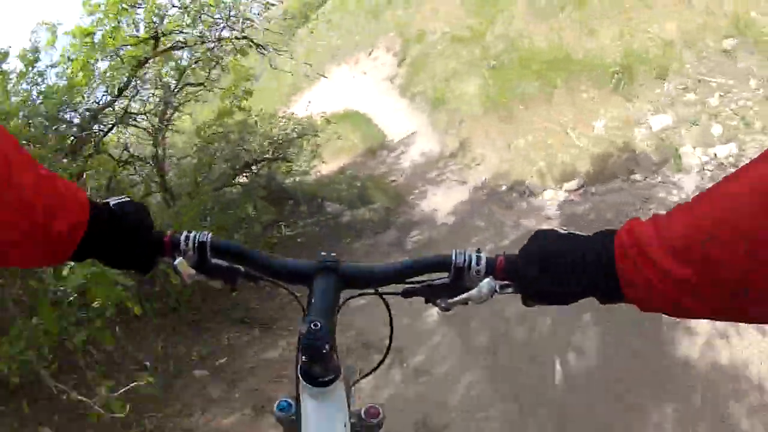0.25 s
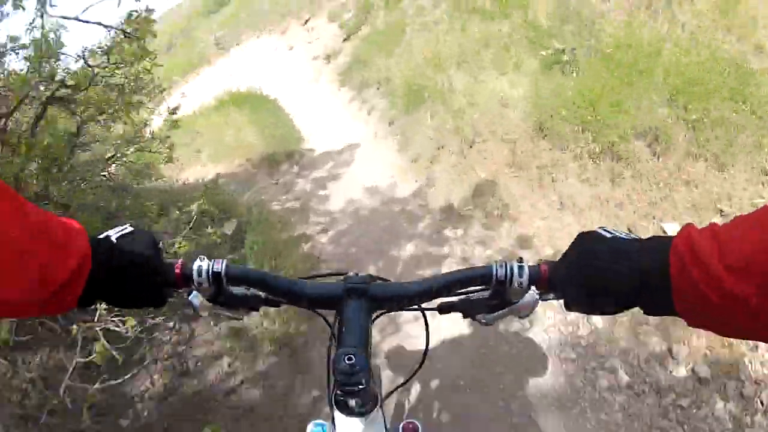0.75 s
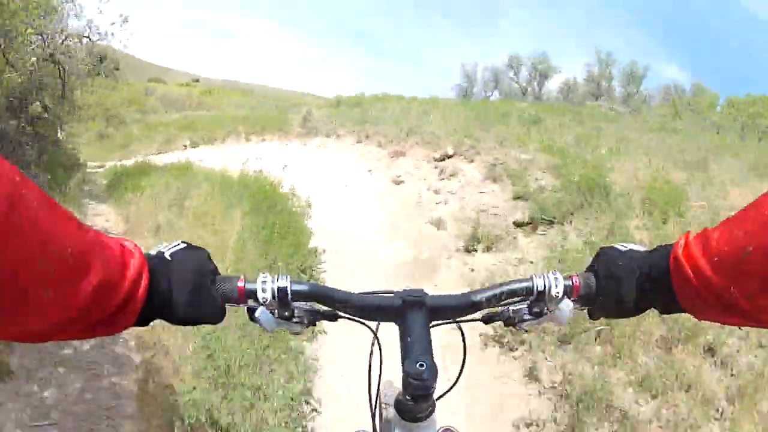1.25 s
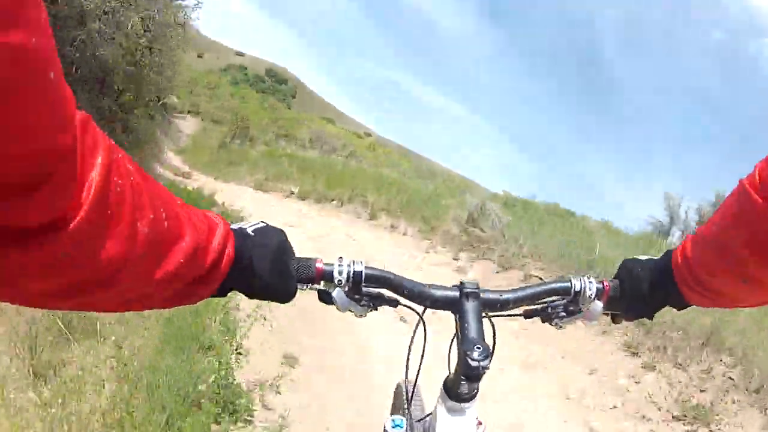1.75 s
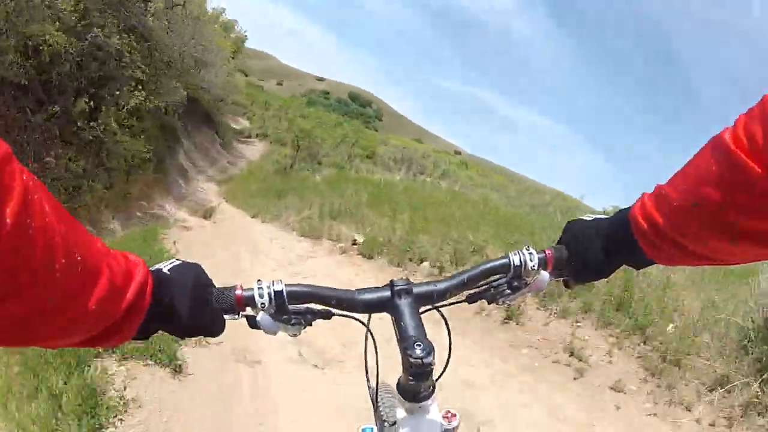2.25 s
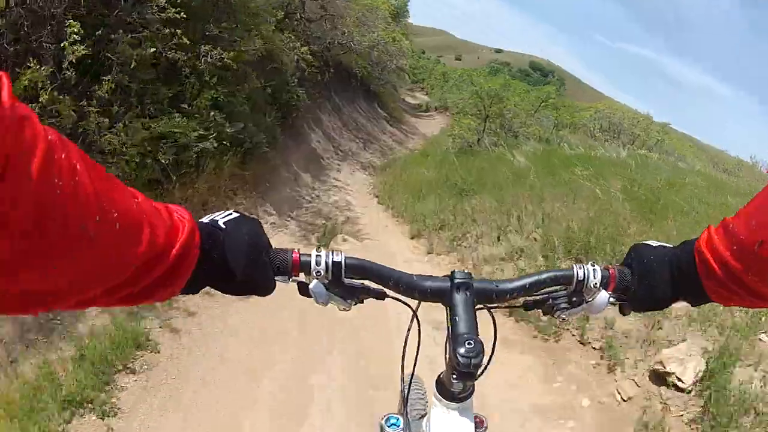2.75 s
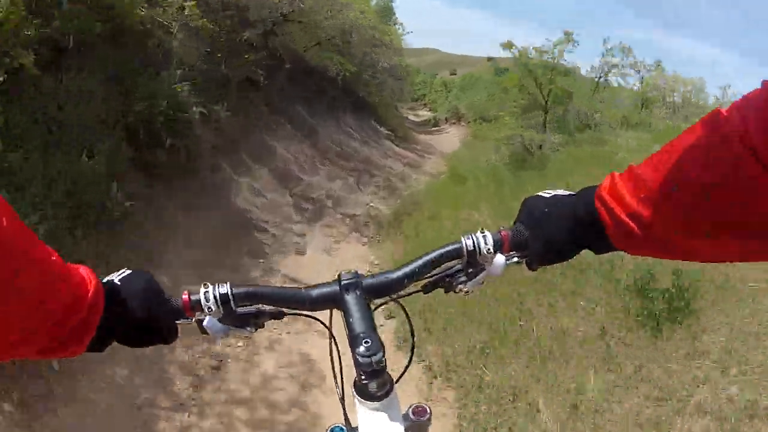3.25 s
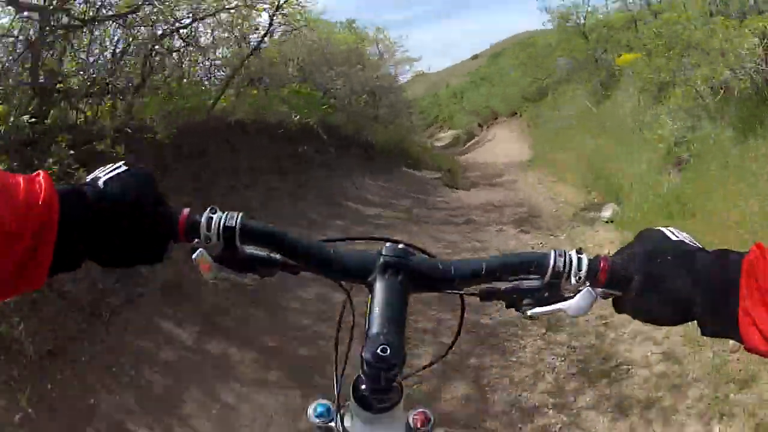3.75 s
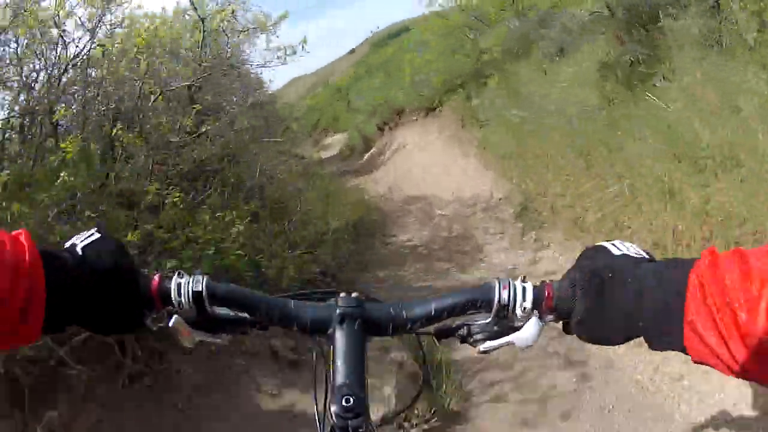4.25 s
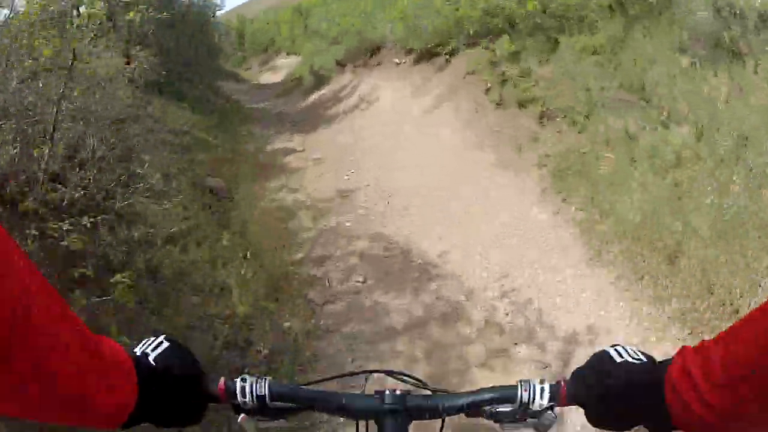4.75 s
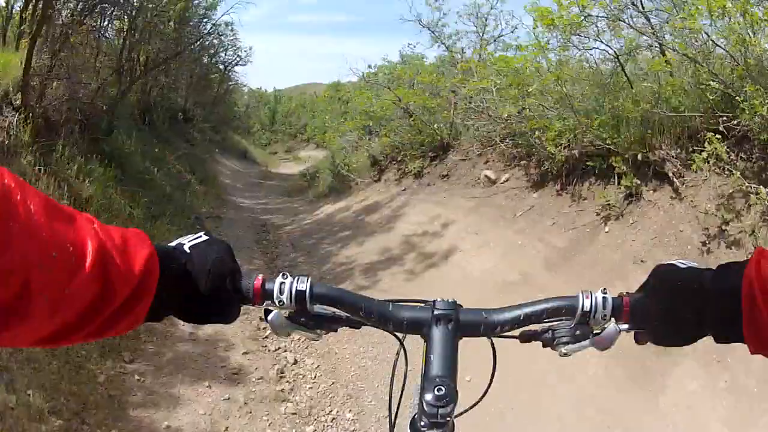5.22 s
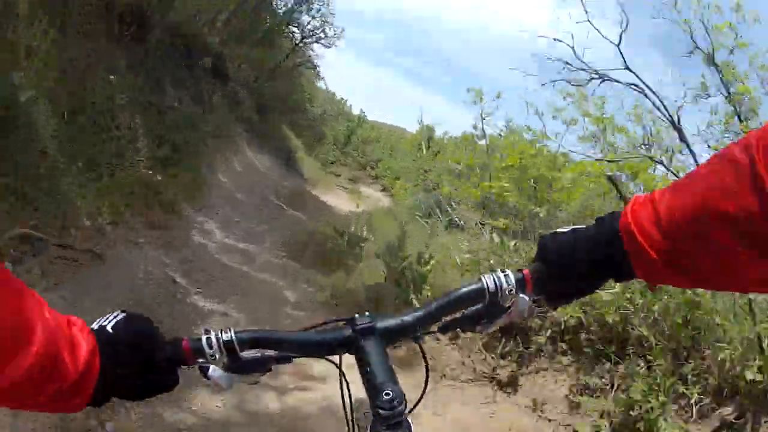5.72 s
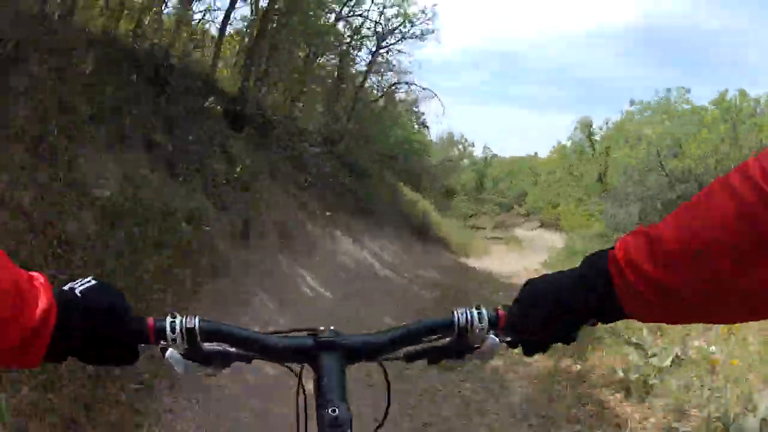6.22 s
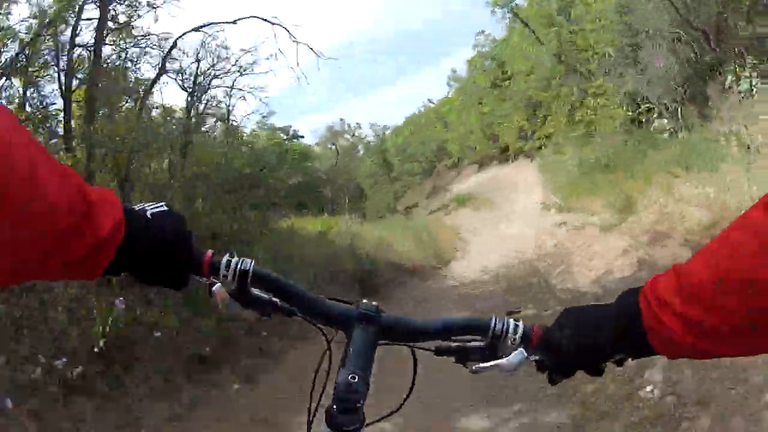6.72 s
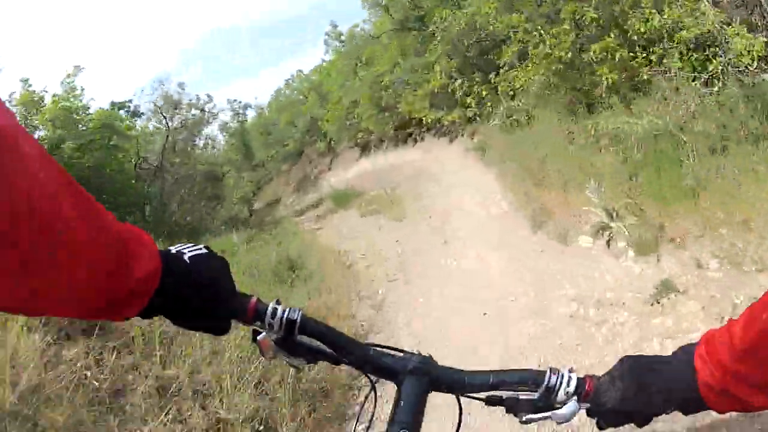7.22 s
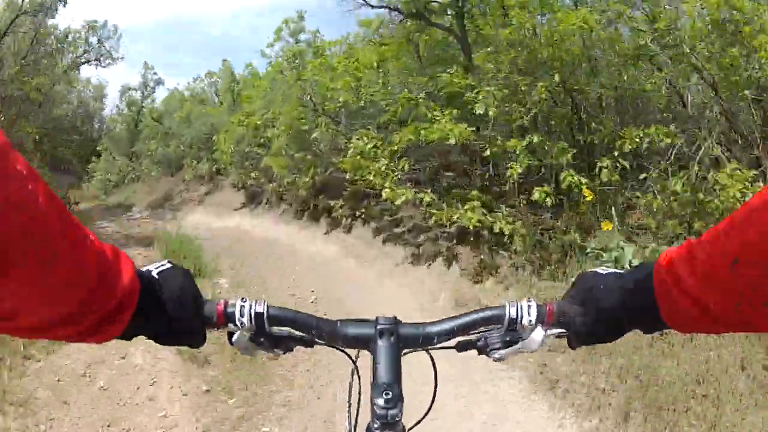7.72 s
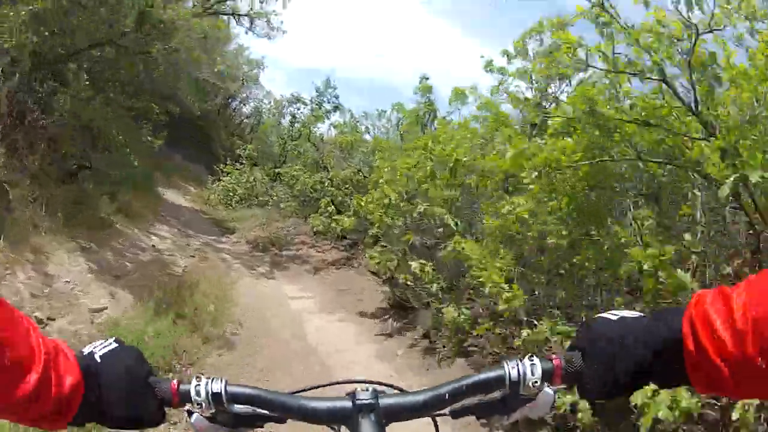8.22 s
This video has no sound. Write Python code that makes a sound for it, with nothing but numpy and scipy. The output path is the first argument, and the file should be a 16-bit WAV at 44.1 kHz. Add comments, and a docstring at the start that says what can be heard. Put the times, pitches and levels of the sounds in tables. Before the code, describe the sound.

Close, muffled, slightly gritty sound from a chest-mounted camera: boomy wind and tyre rumble on dry dirt. Faint brake chirps and chain ticks open the ride. A strong gust covers wheel knocks, then stony crunches come in bursts with snappy plastic taps, metallic chain strikes and one violent mount slam. The tyres lighten over crests before a last cluster of clicks and knocks.

```python
"""A mountain bike runs down a dirt trail, heard from a camera in a plastic case on the rider's chest.
A brake pad sings faintly twice, then the chain jingles, steel partials behind noisy ticks; filtered-noise
wind and tyre rumble run throughout. Gusts lead to the strongest wind near 2.8 s as wheels knock the frame's
damped modes; from 3.4 s gravel crunches in showers of tiny decaying tones, plastic clicks come thick, and the
mount clacks in noise bursts, hardest at 5.1 s. The tyres hush over crests at 4.8 and 7 s before last knocks."""
import sys
import numpy as np
from scipy import signal
from scipy.fft import rfft, irfft, next_fast_len
from scipy.io import wavfile
from scipy.ndimage import map_coordinates

SR = 44100
rng = np.random.default_rng(int(sys.argv[2]) if len(sys.argv) > 2 else 0)


def generate_wav(sig):
    """Save sig (samples, or channels by samples) to the path in sys.argv[1] as 16-bit PCM at SR."""
    pcm = np.round(np.clip(np.atleast_2d(sig).T, -1, 1) * 32767).astype(np.int16)
    wavfile.write(sys.argv[1], SR, pcm)


N = 373527

# Resonances of the case mount. Each row: pitch in Hz, relative level in dB, ring time t60 in seconds
# when nothing else damps it.
MOUNT_MODES = [(1390, -11, 0.032), (2200, -1, 0.047), (2500, -0.5, 0.057), (3005, -7, 0.11),
               (3530, -27, 0.25), (4000, -33, 0.02), (4970, -39, .04)]
# Tone of a chain link ticking on the frame. Each row: frequency in Hz, relative level in dB per Hz.
TICK_SPECTRUM = [(1200, -11), (2600, 1.5), (4000, -1), (4900, 0.5), (5500, -8), (6000, -16)]
SMOOTH_GRIT_DB = -41  # grit on smooth packed dirt, before the fine-grit trim in scene()


def amp(db):
    """Decibels to gain."""
    return 10 ** (np.asarray(db) / 20)


def unit(x):
    """Scale to rms 1."""
    return x / np.sqrt(np.mean(x ** 2) + 1e-20)


def peaked(x):
    """Scale to peak 1."""
    return x / (np.abs(x).max() + 1e-20)


def curves(rows):
    """One value per sample for each column after the time."""
    s, *cols = np.transpose(rows)
    return [np.interp(np.arange(N) / SR, s, c) for c in cols]


def wobble(rate):
    """A smooth random curve, rate knots a second."""
    knots = rng.standard_normal(int(N * rate / SR) + 4)
    return map_coordinates(knots, [np.arange(N) * rate / SR])


def coloured(x, spectrum, size=8192):
    """x through a causal, minimum-phase filter with the given (Hz, dB) points."""
    hz, db = np.transpose(spectrum)
    gain = amp(np.interp(np.log(np.fft.rfftfreq(size, 1 / SR) + 1), np.log(hz), db))
    # fold the cepstrum so that all the energy comes after the start
    cepstrum = irfft(np.log(gain))
    cepstrum[1:size // 2] *= 2
    cepstrum[size // 2 + 1:] = 0
    impulse = irfft(np.exp(rfft(cepstrum)))
    return signal.fftconvolve(x, impulse)[:len(x)]


def ringing(modes, t, scatter_db):
    """Damped modes, struck at new strengths every time."""
    total = 0
    for hz, db, t60 in modes:
        envelope = amp(db + scatter_db * rng.standard_normal() - 60 * t / t60)
        total = total + envelope * np.sin(2 * np.pi * (hz * t + rng.random()))
    return total


def add(track, s, sound):
    """Mix a sound into the track at time s."""
    room = track[max(round(s * SR), 0):][:len(sound)]
    room += sound[:len(room)]


def in_case(x):
    """Sound heard through the plastic case, which muffles it and rings at its resonances."""
    # What the plastic lets through. Each row: frequency in Hz, gain in dB.
    passed = [(400, -3), (1100, -12), (1800, -11.5), (2350, -5), (3000, -3), (3700, -5), (4750, -12.5),
              (5400, -15.5), (6000, -27.5)]
    # Air and wall resonances. Each row: centre in Hz, width in Hz, boost in dB.
    resonances = [(2070, 76, 4.5), (2550, 84, 5.5), (2867, 92, 7), (4680, 134, 8)]
    x = coloured(x, passed)
    boosted = x
    for hz, width, db in resonances:
        b, a = signal.iirpeak(hz, hz / width, fs=SR)
        boosted = boosted + (amp(db) - 1) * signal.lfilter(b, a, x)
    return boosted


def airstream():
    """Wind level in dB: the basic stream plus gusts that swell and fall smoothly."""
    # Strength of the stream on the microphone. Each row: time in seconds, level in dB before gusts.
    stream = [(0, -19.5), (0.18, -26), (0.42, -20), (0.78, -19.5), (1.05, -15), (1.42, -20.5), (1.85, -17),
              (2.14, -21), (2.55, -11.5), (2.82, -4), (3.05, -11), (3.17, -18.5), (3.68, -8), (4.0, -14),
              (4.88, -11.5), (5.02, -19), (5.55, -19), (5.9, -20), (6.05, -15), (6.85, -17.5), (7.35, -19),
              (7.9, -16.5), (8.14, -20), (8.47, -25.5)]
    # Sudden gusts on top. Each row: time of the peak in seconds, length in seconds, boost in dB.
    gusts = [(0.62, 0.21, 2.5), (1.711, 0.096, 4.5), (2.054, 0.058, 5), (2.233, 0.15, 7.5),
             (2.329, 0.087, 4), (2.473, 0.16, 7), (5.11, 0.14, 6.5), (5.272, 0.19, 4.5), (5.64, 0.26, 5),
             (6.844, 0.2, 2.5), (7.82, 0.08, 3), (8.24, 0.11, 7)]
    level_db, = curves(stream)
    for s, length, boost_db in gusts:
        add(level_db, s - length / 2, boost_db * np.hanning(round(length * SR)))
    return level_db


def wind(level_db, lumps_db=0.95, tearing_db=-28.5):
    """Eddies hit the microphone in quick lumps; stronger gusts tear up more fine turbulence."""
    # Low buffeting. Each row: frequency in Hz, relative level in dB per Hz.
    buffet_spectrum = [(12, -3), (28, -7.5), (60, -2.5), (120, 0.5), (200, 0), (300, -1.5), (420, -8),
                       (600, -18.5), (900, -31.5), (1500, -44), (3000, -59), (4800, -52), (6000, -72)]
    # Fine turbulence. Each row: frequency in Hz, relative level in dB per Hz.
    tearing_spectrum = [(300, -29), (800, 11.5), (1500, -1.5), (3000, -28.5), (4800, -44), (6000, -18)]
    lumps = amp(lumps_db * wobble(28))
    buffet = unit(coloured(rng.standard_normal(N), buffet_spectrum) * lumps)
    force = amp(level_db) * buffet
    turbulence = unit(coloured(rng.standard_normal(N), tearing_spectrum))
    return force + amp(tearing_db) * force ** 2 * turbulence


def ground():
    """Grit level in dB: each patch of gravel builds up, holds and settles over the packed dirt."""
    # Tyres biting into loose gravel. Each row: time of full bite in seconds, build-up time constant in
    # seconds, hold in seconds, level in dB of the patch alone, before load and trim.
    patches = [(0.34, 0.03, 0.017, -40.5), (0.587, 0.066, 0.34, -40.5), (1.062, 0.27, 0.14, -32),
               (1.476, 0.06, 0.054, -32.5), (2.446, 0.027, 0.79, -44), (3.395, 0.07, 0.28, -35.5),
               (3.63, 0.037, 0.32, -29.5), (4.25, 0.04, 0.11, -33.5), (4.435, 0.037, 0.15, -29.5),
               (4.918, 0.039, 0.12, -29), (5.33, 0.097, 0.28, -32), (6.166, 0.038, 0.02, -35),
               (6.414, 0.11, 0.15, -31.5), (6.765, 0.02, 0.05, -43.5), (7.25, 0.06, 0.12, -41),
               (7.438, 0.039, 0.33, -30), (7.98, 0.073, 0.48, -32.5), (8.073, 0.055, 0.13, -26.5)]
    settle_s = 0.17  # time constant of the crunch dying away
    t = np.arange(N) / SR
    power = amp(SMOOTH_GRIT_DB) ** 2
    for s, build_up, hold, db in patches:
        rise = np.maximum(s - t, 0) / build_up
        fall = np.maximum(t - s - hold, 0) / settle_s
        power = power + (amp(db) * np.exp(-rise - fall)) ** 2
    return 10 * np.log10(power)


def unloading():
    """How many dB the load on the tyres drops while the bike is light over a crest."""
    # Each row: start in seconds, length in seconds, drop in dB (a negative drop is a slight rise).
    crests = [(3.05, 0.29, -0.5), (4.75, 0.155, 4), (7.027, 0.355, 8)]
    lift_s = 0.076  # time the tyres take to unload, and to load again
    t = np.arange(N) / SR
    drop_db = 0
    for s, length, db in crests:
        drop_db = drop_db + db * np.clip(np.minimum(t - s, s + length - t) / lift_s, 0, 1)
    return drop_db


def tyres(level_db):
    """Knobs drum on uneven dirt; the rumble comes up through frame and rider."""
    # Each row: frequency in Hz, relative level in dB per Hz.
    rumble_spectrum = [(100, -38), (280, -1), (400, -0.5), (520, -0.5), (620, -3.5), (740, -13.5),
                       (900, -25.5), (1300, -31), (2000, -41), (5000, -80)]
    drumming = amp(2.64 * wobble(40))
    return amp(level_db) * unit(coloured(rng.standard_normal(N), rumble_spectrum) * drumming)


def grit(level_db, stones_per_s=1100, spread_db=0.0, stone_hz=2800, pitch_spread=0.58, cycles=1.27, dust_db=-1):
    """Small stones snap under the tyres, each at a pitch of its own, in clumps over a hiss of dust."""
    draws = rng.standard_normal((int(stones_per_s * N / SR), 2))
    t = np.arange(SR // 200) / SR
    hz = np.clip(stone_hz * np.exp(pitch_spread * draws[:, :1]), 700, 5600)
    strength = amp(spread_db * np.minimum(draws[:, 1:], 2))
    snaps = strength * np.sin(2 * np.pi * hz * t) * np.exp(-hz * t / cycles)
    snaps = snaps * np.sqrt(hz)  # small stones ring more briefly but snap harder
    places = rng.integers(0, N, (len(draws), 1)) + np.arange(len(t))
    stones = unit(np.bincount(places.ravel(), snaps.ravel(), N)[:N])
    dust = amp(dust_db) * rng.standard_normal(N)
    clumps = amp(1.5 * wobble(45))
    return amp(level_db) * unit(in_case((stones + dust) * clumps))


def clicks(grit_db, scrape_db=-15, scrape_t60=0.016, body_db=-3, body_t60=0.053):
    """Plastic taps plastic: a rounded snap and a very short scrape shake the case and its mount."""
    # Sharp clicks of case and mount. Each row: start in seconds, peak level in dB.
    taps = [(0.6338, -13.5), (1.1614, -15.5), (1.8683, -27.5), (2.3248, -20.5), (3.46, -14.5), (3.6282, -8),
            (3.637, -12), (3.7345, -9), (4.229, -13.5), (4.9269, -7.5), (5.4752, -12), (5.7806, -14.5),
            (6.4231, -9.5), (6.492, -7), (6.547, -6), (6.594, -13.5), (6.767, -16.5), (7.404, -12.5),
            (7.4568, -12), (7.7112, -8.5), (7.7598, -10), (8.054, -9.5), (8.11, -6.5), (8.3276, -13.5)]
    # lesser clicks come by chance and follow the grit
    stray_per_s, stray_over_grit_db = 5, 12
    track, t = np.zeros(N), np.arange(SR // 10) / SR
    places = rng.integers(0, N, int(stray_per_s * N / SR))
    strays = [(i / SR, grit_db[i] + stray_over_grit_db) for i in places]
    for s, db in [*taps, *strays]:
        scrape = amp(scrape_db) * rng.standard_normal(len(t)) * amp(-60 * t / scrape_t60)
        contact = (t == 0) + scrape  # a single-sample tap starts the scrape
        snap = in_case(coloured(contact, [(1500, -3), (3300, -1.5), (5500, -9)]))
        body = ringing(MOUNT_MODES, t, scatter_db=3.5) * amp(-60 * t / body_t60)
        add(track, s, amp(db) * peaked(peaked(snap) + amp(body_db) * peaked(body)))
    return track


def jolts(ring_db=-9, bounce_s=0.011, bounce_db=-9):
    """The mount slams against its stop, bounces once and rings."""
    # Hard jolts. Each row: start in seconds, peak of the first crack in dB before its ring is added,
    # t60 of the crack's noise in seconds before the case rings.
    slams = [(4.449, -12.5, 0.16), (4.522, -15, 0.17), (4.559, -12.5, 0.11), (4.602, -6.5, 0.04),
             (5.134, 4, 0.014), (5.46, -14, 0.055), (7.942, -8.5, 0.029), (7.953, -7.5, 0.022)]
    track, t = np.zeros(N), np.arange(SR // 5) / SR
    for s, db, crack_t60 in slams:
        for delay, loss_db in [(0, 0), (bounce_s, bounce_db)]:
            crack = in_case(rng.standard_normal(len(t)) * amp(-60 * t / crack_t60))
            ring = amp(ring_db) * peaked(ringing(MOUNT_MODES, t, scatter_db=3))
            add(track, s + delay, amp(db + loss_db) * (peaked(crack) + ring))
    return track


def knocks():
    """A wheel meets a stone or rut and the frame answers with a dull knock."""
    # Each row: start in seconds, peak level in dB.
    hits = [(2.218, -12.5), (2.478, -3.5), (2.721, -6), (4.563, -8.5), (4.602, -6), (5.587, -14),
            (8.057, -5.5), (8.108, -7), (8.121, -11), (8.241, -11)]
    # Frame resonances. Each row: pitch in Hz, relative level in dB, ring time t60 in seconds.
    frame_modes = [(406, 1.5, 0.022), (615, 0.5, 0.027), (817, -15, 0.048), (1410, -15.5, 0.016)]
    track, t = np.zeros(N), np.arange(SR // 8) / SR
    soft_onset = 1 - np.exp(-t / 0.0016)
    for s, db in hits:
        add(track, s, amp(db) * peaked(ringing(frame_modes, t, scatter_db=1.5) * soft_onset))
    return track


def chain(tick_t60=0.053, ring_db=-2, detune=0.16):
    """Steel links tick on the frame; a link that swings free rings on, a pinched one is dull and off pitch."""
    # Chain and cables striking the frame. Each row: start in seconds, peak of the tick in dB before
    # the ring is added, ring time t60 in seconds.
    strikes = [(0.48, -28, 0.018), (0.610, -20, 0.022), (0.668, -16.5, 0.087), (0.730, -24, 0.027),
               (0.817, -25, 0.033), (0.885, -25, 0.018), (0.941, -21.5, 0.022), (2.548, -21, 0.015),
               (2.956, -35, .03), (3.002, -27, 0.04), (3.158, -25, 0.016), (4.455, -17, 0.037),
               (4.605, -8.5, 0.048), (4.693, -16, 0.027), (4.706, -15.5, .04), (5.011, -12, 0.016),
               (5.049, -14.5, .03), (5.135, -7, 0.039), (5.267, -21, 0.034), (8.178, -21, 0.025),
               (8.241, -20, .025)]
    # Partials of the steel. Each row: pitch in Hz before detuning, relative level in dB before scatter.
    partials = [(3106, -8), (3612, -3), (4344, 2), (5469, 0)]
    track, t = np.zeros(N), np.arange(SR // 4) / SR
    for s, db, t60 in strikes:
        tick = coloured(rng.standard_normal(len(t)) * amp(-60 * t / tick_t60), TICK_SPECTRUM)
        pitch = 1 + detune * rng.standard_normal() * np.exp(-t60 / 0.035)  # short rings stray furthest
        ring = 0
        for hz, level in partials:
            ring = ring + amp(level + 2 * rng.standard_normal()) * np.sin(2 * np.pi * hz * pitch * t)
        add(track, s, amp(db) * (peaked(tick) + amp(ring_db) * peaked(ring) * amp(-60 * t / t60)))
    return track


def chatter(grit_db, ticks_per_s=28, spread_db=3, below_db=-16, decay_s=0.0094):
    """The loose chain keeps ticking faintly under the loud strikes, louder on stony ground."""
    strength = amp(spread_db * np.minimum(rng.standard_normal(N), 1))
    ticks = (rng.random(N) < ticks_per_s / SR) * strength
    envelope = signal.lfilter([1], [1, -np.exp(-1 / (decay_s * SR))], ticks)
    bursts = envelope * rng.standard_normal(N)
    return amp(grit_db + below_db) * unit(coloured(bursts, TICK_SPECTRUM))


def brake(waver=0.013):
    """The pad touches the disc for a moment and it sings faintly, a sine of wavering pitch."""
    # Each row: start in seconds, length in seconds, centre pitch in Hz, peak level in dB.
    touches = [(0.11, 0.031, 3470, -32), (0.36, 0.054, 3450, -35)]
    track, drift = np.zeros(N), wobble(250)
    for s, length, hz, db in touches:
        pitch = hz * (1 + waver * drift[round(s * SR):][:round(length * SR)])
        tone = np.sin(2 * np.pi * np.cumsum(pitch) / SR)
        add(track, s, amp(db) * np.hanning(len(pitch)) * tone)
    return track


def scene(eddy_db=0.5, bump_db=1.0, fine_db=-0.74):
    """Air, tyres and rattles at one microphone; airstream and ground drive all the steady layers."""
    reference_air_db, reference_grit_db = -16, -35
    # rumble: level at both reference levels, then dB per dB of airstream and of rough ground
    rumble_db, rumble_per_air, rumble_per_grit = -23.5, 0.81, 0.36
    # deep gravel throws up larger stones: level against the reference grit, then dB per dB of grit
    coarse_offset_db, coarse_per_grit = -9, 1.46

    air_db, ground_db, light_db = airstream(), ground(), unloading()
    load_db = bump_db * wobble(16) - light_db  # small bumps press the tyres down and let them go
    tyre_db = rumble_db + rumble_per_air * (air_db - reference_air_db)
    tyre_db = tyre_db + rumble_per_grit * (ground_db - reference_grit_db)
    grit_db = np.maximum(ground_db + load_db, SMOOTH_GRIT_DB)
    coarse_db = reference_grit_db + coarse_offset_db + coarse_per_grit * (grit_db - reference_grit_db)

    rolling = tyres(tyre_db + load_db) + grit(grit_db + fine_db)
    rolling += grit(coarse_db, stones_per_s=200, spread_db=2, stone_hz=2100, pitch_spread=0.24,
                    cycles=3.1, dust_db=-4)
    rattles = clicks(grit_db) + jolts() + knocks() + chain() + chatter(grit_db) + brake()
    return (wind(air_db + eddy_db * wobble(12)) + rolling + rattles)[None]


def limited(x, threshold_db=1.5, recover_db_per_s=90, attack_s=0.014):
    """A slow limiter lets a bang through, ducks just after it and recovers."""
    ramp = recover_db_per_s * np.arange(N) / SR
    over_db = np.maximum(20 * np.log10(np.abs(x) + 1e-9) - threshold_db, 0)
    duck_db = np.maximum.accumulate(over_db + ramp, axis=1) - ramp  # peak hold with a straight fall
    keep = np.exp(-1 / (attack_s * SR))
    return x * amp(-signal.lfilter([1 - keep], [1, -keep], duck_db))


def record(dry, hardness=10):
    """The camera limits, samples coarsely, rounds off the highest peaks and holds each sample as a step."""
    hold_hz, top_hz = 12000, 15300  # coarse sampling rate, top of the treble
    ceiling = 0.96  # full-scale fraction that the peaks bend towards
    x = signal.resample_poly(limited(dry), hold_hz, SR, axis=1)
    x = x / (1 + np.abs(x / ceiling) ** hardness) ** (1 / hardness)
    # the steps mirror the whole sound around the sampling rate: a gritty, fizzing treble
    steps = signal.resample_poly(np.repeat(x, 4, axis=1), SR, 4 * hold_hz, axis=1)
    size = next_fast_len(N + SR // 4)
    below_top = np.fft.rfftfreq(size, 1 / SR) < top_hz
    return irfft(rfft(steps, size) * below_top, size)[:, :N]


dry = scene()
out = record(dry)
generate_wav(out)
```